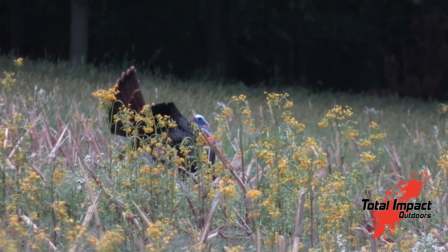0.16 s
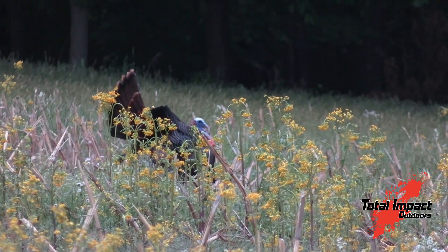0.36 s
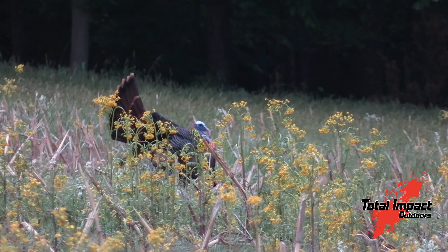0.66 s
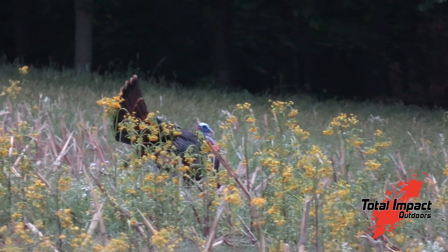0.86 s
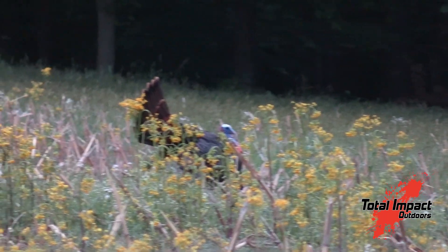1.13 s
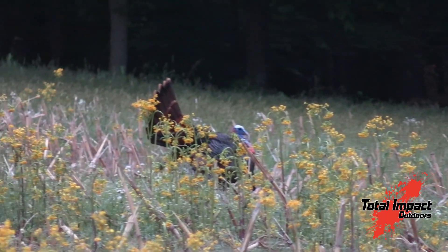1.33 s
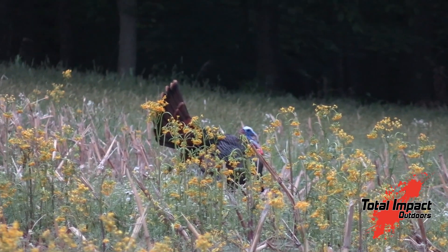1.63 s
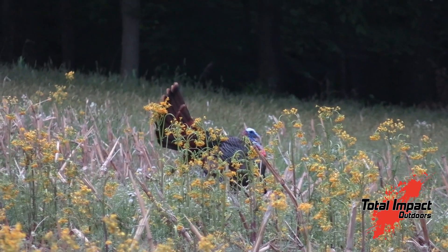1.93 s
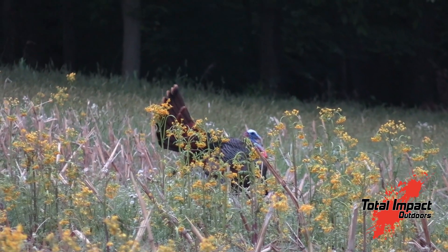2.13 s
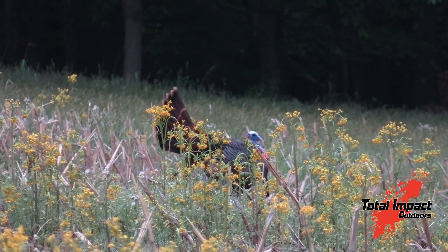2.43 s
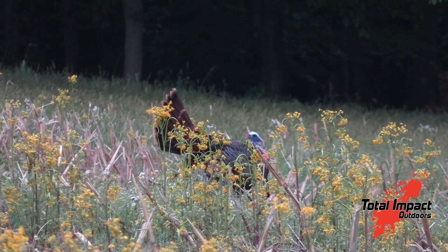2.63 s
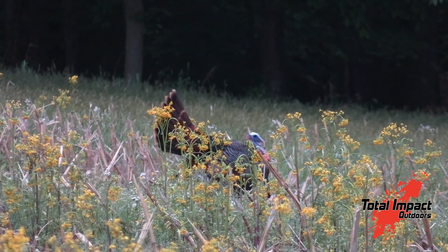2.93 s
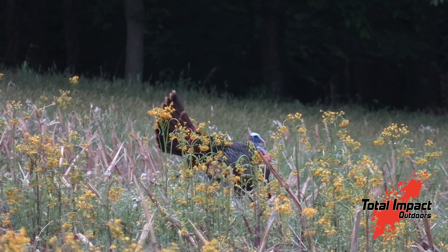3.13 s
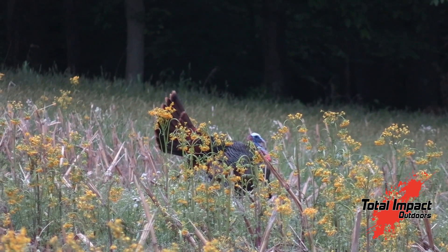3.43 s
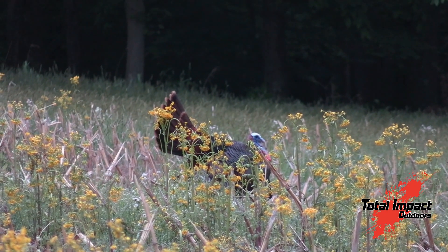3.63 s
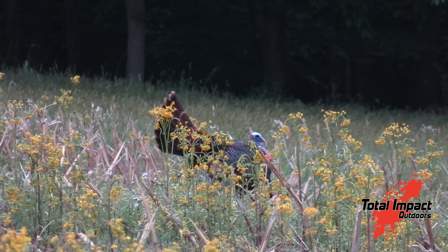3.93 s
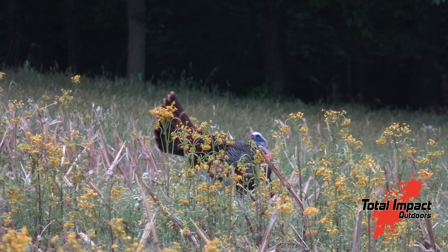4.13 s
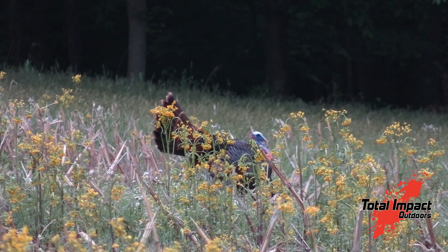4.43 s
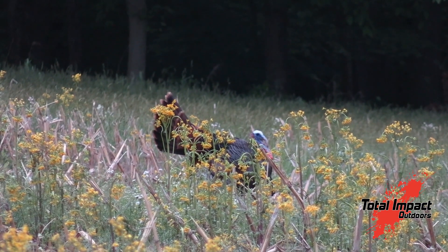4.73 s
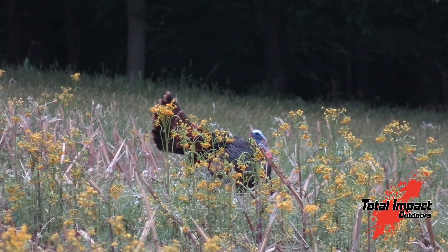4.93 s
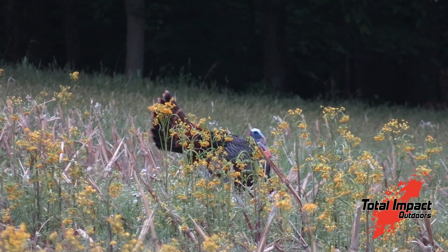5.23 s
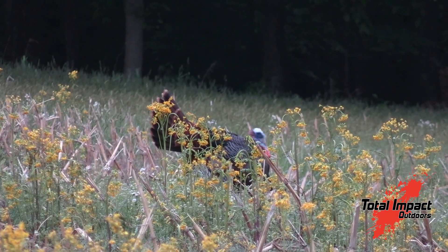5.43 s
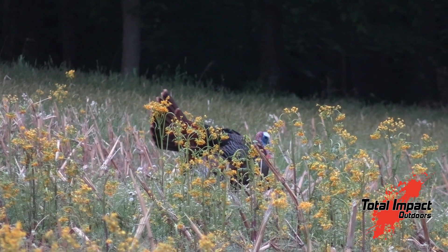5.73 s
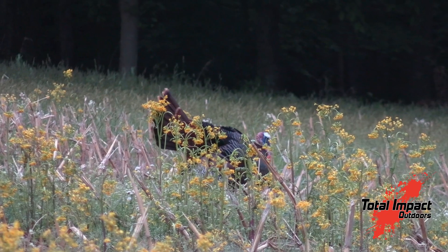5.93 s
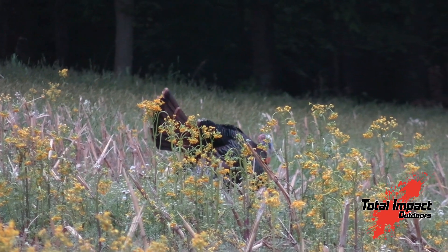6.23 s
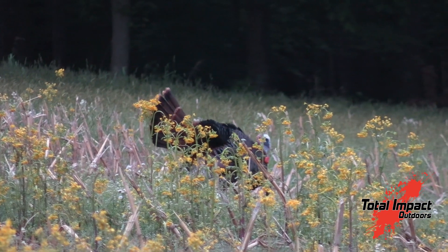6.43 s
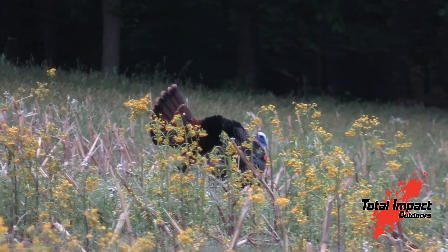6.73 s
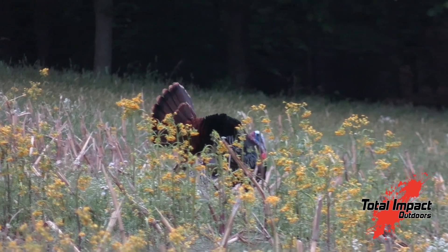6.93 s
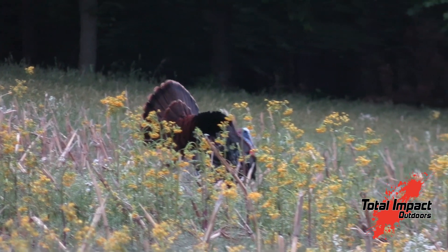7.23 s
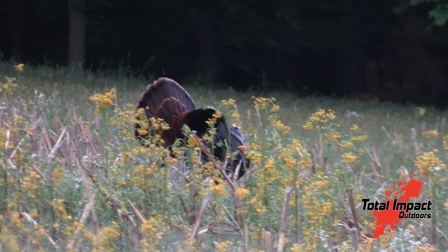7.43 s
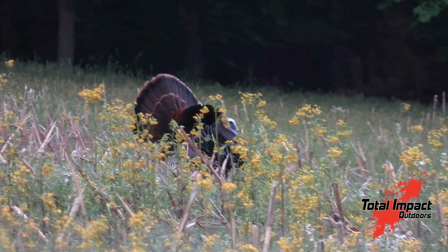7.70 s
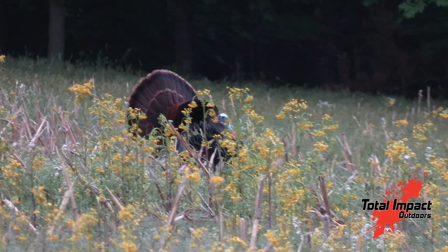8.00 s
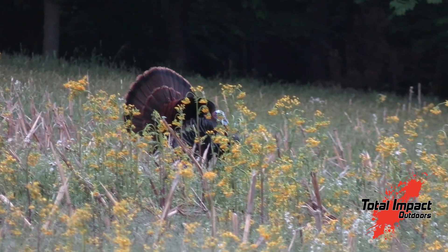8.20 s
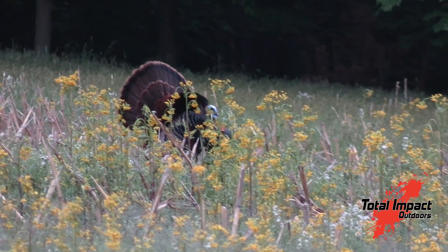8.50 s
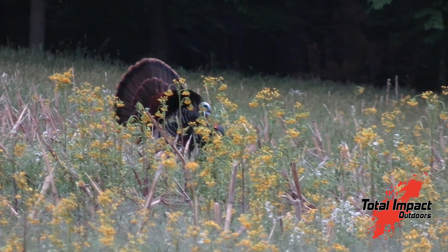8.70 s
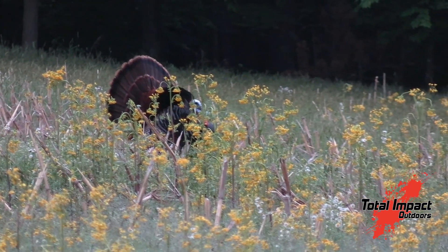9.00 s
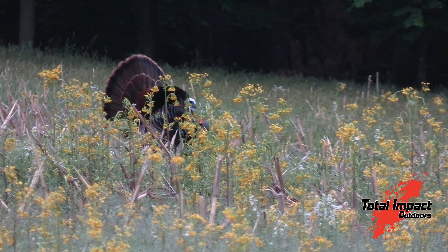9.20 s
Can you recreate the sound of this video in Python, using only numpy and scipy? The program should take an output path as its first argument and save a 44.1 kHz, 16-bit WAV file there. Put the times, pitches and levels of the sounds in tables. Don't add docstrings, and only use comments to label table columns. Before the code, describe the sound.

A near cricket repeats short bright chirps of a few pulses, answered by a second farther one and a faint third. Behind them many songbirds whistle, slur and twitter, smeared by woodland echo into a hissing chorus. Dull knocks bump the camera around one and a half seconds; a tick comes near four, then a soft thud with leaf rustle near eight. Low hum and light wind, one small outdoor camera microphone.

```python
import sys
import numpy as np
from scipy import signal
from scipy.fft import rfft, irfft
from scipy.io import wavfile
from scipy.ndimage import uniform_filter1d

SR = 44100
rng = np.random.default_rng(int(sys.argv[2]) if len(sys.argv) > 2 else 0)


def file_out(sig):
    cols = np.atleast_2d(sig).T
    lim = np.clip(cols, -1, 1)
    pcm = np.round(lim * 32767).astype(np.int16)
    wavfile.write(sys.argv[1], SR, pcm)


def natural_amplitude(level_db):
    exponent = np.asarray(level_db, float) / 20
    return 10 ** exponent


N = 412776

# pitch_hz, level_db (per Hz)
AIR = [(25, -17), (55, -17), (100, -5), (200, -12.5), (450, -15.5), (800, -12), (1300, -14), (2000, -19),
       (4500, -16.5), (5700, -31.5), (7000, -33.5), (10000, -35.5), (15000, -40)]
AIR_DB = -53.5
# start_s, level_db
RUMBLE = [(0, -84), (.5, -80), (.65, -66), (1.45, -59.5), (1.8, -68), (2.1, -58), (2.3, -77),
          (4.001, -75.5), (9.36, -64)]
# start_s, length_s, level_db
GUSTS = [
    (.35, .5, -65.5),
    (7.4, 1.3, -60),
    (8.2, 1.6, -68),
]
STEADY_BREEZE_DB = -75.5
# pitch_hz, width_hz, level_db
HUMS = [
    (132.7, 9.65, -60.5),
    (592, 8, -73),
]
# start_s, length_s, pitch_hz, width_hz, level_db
DRONE = (7, 3.5, 1336, 300, -63.5)

# start_s, level_db, lean_db_per_octave (to the higher voices)
FLOCK = [(0.0, -46, -0.5), (0.94, -47, 10), (1.54, -46, 1), (2.4, -47, 9), (2.63, -50, -2),
         (3.0, -56.5, -2), (3.23, -51.5, -4), (3.52, -45.5, -5), (3.91, -52.5, 2), (4.82, -47.5, -8),
         (5.13, -53, -10), (6.31, -46.5, 5), (7.04, -51.5, -3), (7.3, -48.5, 8), (7.45, -46.5, -1),
         (8.0, -51, 5.5), (8.86, -46.5, 1), (9.36, -47.5, 2)]
# pitch_hz, level_db
CHORUS_EDGES = [(1800, -23.5), (2250, -8.5), (2600, -3.5), (3550, 5), (4700, 0), (5100, -21.5), (6500, -29),
                (9500, -77)]
# pitch_hz, level_db
TREBLE = [(4300, -30), (5100, 10.5), (5900, -0.5), (6500, -6.5), (7800, -17), (9500, -57)]
# start_s, length_s, level_db
TREBLE_SPELLS = [
    (-.3, 1.2, -83),
    (.95, 0.87, -79.5),
    (1.4, 1.4, -79),
    (7.8, 2.7, -84),
]
BUZZES_S = [.15, 3.25, 6.67]
# length_s, pitch_hz, width_hz, level_db
BUZZ = (.17, 6400, 1000, -81.5)

# start_s, length_s, pitch_hz, level_db
HELD = [(.05, 0.062, 4024, -54.5), (0.34, 0.14, 3914, -58), (0.689, 0.045, 3950, -51),
        (0.923, 0.066, 3370, -50), (0.972, 0.06, 3250, -52), (1.08, 0.042, 5430, -59),
        (1.05, .03, 4700, -57), (1.135, 0.065, 2490, -57.5), (7.355, .05, 3050, -56),
        (2.34, .02, 2230, -56.5), (3.39, .025, 3600, -49), (8.41, 0.054, 2300, -66), (5.44, .03, 2290, -61),
        (5.645, .016, 2330, -60), (5.365, .02, 2380, -59), (3.521, 0.14, 3590, -53),
        (4.416, 0.17, 3035, -61), (6.375, 0.072, 3300, -58), (5.108, .04, 3050, -60),
        (4.62, 0.1, 2950, -60), (4.8, 0.049, 2194, -58), (5.422, 0.069, 3890, -50),
        (5.663, 0.16, 4030, -52.5), (6.7, 0.067, 4330, -50), (6.6, 0.06, 4330, -56),
        (6.35, 0.14, 3665, -53), (6.47, 0.12, 3660, -56), (7.07, 0.058, 5810, -71), (8.3, .09, 4620, -57),
        (8.0, 0.089, 4160, -55), (8.349, 0.055, 2530, -59.5), (8.551, 0.094, 2270, -61),
        (8.953, 0.04, 3170, -43), (9.0, 0.052, 3170, -57)]
# start_s, length_s, start_hz, end_hz, level_db
RISES = [(.72, 0.038, 4640, 5160, -54), (1.158, 0.025, 2640, 3230, -52), (2.132, 0.015, 3070, 3380, -46),
         (2.36, 0.023, 2950, 3330, -41.5), (2.345, .016, 2300, 2950, -53), (3.3, 0.048, 2560, 2700, -56),
         (3.425, 0.033, 3130, 3650, -46), (3.6, 0.024, 3050, 3400, -42), (4.11, 0.032, 2490, 2770, -56),
         (4.72, .04, 3180, 3670, -53), (4.838, 0.026, 2220, 3160, -48), (5.46, 0.024, 2260, 3120, -59),
         (5.635, 0.035, 3500, 4060, -49), (5.65, .05, 3450, 3600, -55), (5.85, 0.05, 2320, 2740, -53.5),
         (5.94, 0.071, 2150, 2910, -58), (5.975, 0.056, 3500, 4350, -50), (6.16, .04, 3000, 4080, -46),
         (6.268, 0.023, 3090, 3325, -42.5), (6.235, .04, 2350, 3000, -52), (6.6, .04, 3270, 3500, -56),
         (5.93, .035, 2900, 3570, -55), (6.51, .035, 2250, 2560, -55.5), (6.55, 0.042, 2810, 3260, -52.5),
         (.908, .018, 2590, 2950, -59), (7.31, 0.0305, 3000, 3450, -51), (7.335, .04, 3450, 3800, -59),
         (8.752, 0.024, 2950, 3400, -44.5), (8.775, .06, 3400, 3500, -55), (8.82, .04, 2410, 2760, -58)]
# start_s, length_s, start_hz, end_hz, level_db
FALLS = [(1.176, 0.08, 3266, 3180, -42.5), (4.758, 0.018, 3420, 3050, -44), (.77, 0.045, 3700, 3230, -56),
         (.883, .028, 3050, 2600, -53), (1.27, 0.16, 2515, 2255, -61.5), (2.235, 0.037, 3350, 2905, -43.5),
         (2.328, .018, 2800, 2250, -56), (2.41, 0.04, 2770, 2560, -53), (2.5, 0.074, 3010, 2210, -58),
         (3.44, 0.063, 3370, 2485, -49.5), (3.619, 0.051, 3300, 2520, -52), (4.06, 0.048, 3200, 2370, -63),
         (4.77, 0.033, 3120, 2260, -52), (5.435, 0.03, 3400, 2215, -56), (5.78, 0.08, 3250, 2270, -58),
         (5.86, 0.068, 2700, 2150, -63), (6.2, 0.049, 3450, 2190, -54), (5.175, .02, 3900, 3550, -54),
         (5.46, .03, 3700, 3000, -52), (7.49, 0.038, 2480, 2420, -55), (6.31, 0.0596, 4080, 3650, -49),
         (7.159, .07, 5570, 4040, -55), (7.272, 0.017, 3400, 2950, -50), (7.288, .035, 2750, 2480, -56),
         (3.585, .015, 3350, 2760, -46), (7.44, 0.031, 3340, 2505, -47), (7.49, 0.042, 2450, 2110, -55),
         (8.2, 0.056, 3300, 2550, -57.5), (8.27, 0.042, 2890, 2210, -59), (8.5, 0.057, 2700, 2200, -59),
         (8.782, .022, 2900, 2500, -48), (8.808, 0.019, 2690, 2170, -54), (8.918, 0.021, 3340, 2820, -45.5)]
RISE_DONE, FALL_DONE = .6, .66
# delay_s, length_s, start_hz, end_hz, level_db
COUPLET = [
    (0, 0.031, 2183, 2500, -56),
    (.035, .03, 2550, 2800, -58),
    (.1, 0.071, 3020, 3040, -56),
]
SWOOP = [
    (0, .025, 5750, 4950, -60),
    (.02, 0.036, 4970, 4950, -57),
    (.06, 0.037, 4940, 6060, -62.5),
    (.095, 0.1, 6080, 6140, -71.5),
]
FLICK = [(0.008, 0.014, 4750, 5720, -60)]
HOOK = [
    (.005, .035, 4690, 5920, -61),
    (.035, .09, 5850, 5900, -72),
]
COUPLETS_S = [6.254, 6.585, 6.919, 7.249, 7.59]
# syllable, delay_s
HIGH_SONG = [(SWOOP, 0), (SWOOP, .272), (FLICK, .568), (FLICK, .678), (HOOK, 1.088), (HOOK, 1.31)]
HIGH_SONGS_S = [-.062, 7.853]
# start_s, length_s, start_hz, middle_hz, end_hz, level_db
CHIPS = [
    (1.409, .016, 10900, 7100, 10800, -49),
    (5.495, 0.015, 10600, 7170, 10300, -47),
]
# start_s, length_s,
# start_hz, end_hz, level_db
DEEP_SLURS = [(.55, .09, 3790, 3940, -45), (.66, .08, 3850, 4060, -48), (4.49, 0.056, 3300, 3500, -56),
              (4.5, .12, 5100, 5250, -64), (4.63, .05, 5000, 5400, -61), (0.049, 0.14, 3850, 4070, -58),
              (.3, .12, 3850, 3940, -54), (0.623, 0.035, 4000, 5600, -59), (0.929, 0.16, 3400, 3474, -51),
              (1.02, .035, 4300, 5800, -59), (1.199, 0.096, 3600, 6000, -54),
              (1.98, 0.047, 2750, 3000, -60), (1.996, 0.21, 3650, 3740, -48),
              (2.358, 0.064, 3300, 3900, -41.5), (3.33, 0.083, 3400, 3740, -54),
              (4.45, 0.082, 3000, 3610, -56), (4.847, 0.097, 3000, 3070, -53),
              (4.94, 0.073, 2900, 3600, -55), (5.406, 0.043, 3300, 3900, -51),
              (5.459, 0.048, 2300, 3520, -60), (5.641, 0.046, 3500, 4060, -49),
              (5.935, .05, 3000, 3604, -45.5), (5.999, 0.096, 3450, 3660, -49.5),
              (6.211, 0.043, 4300, 5000, -49), (6.25, 0.076, 2500, 3520, -58),
              (6.569, .07, 3000, 3580, -52), (6.802, .04, 2900, 3730, -47), (7.44, 0.045, 3600, 4600, -52),
              (7.679, 0.084, 2350, 3130, -53.5), (8.25, 0.068, 3700, 4200, -50.5),
              (8.54, 0.034, 4500, 5380, -53),
              (.75, 0.074, 3800, 3200, -48), (1.5, 0.078, 3785, 3600, -46.5),
              (1.62, 0.073, 3210, 2450, -58), (1.78, 0.11, 3750, 3500, -48.5), (2.2, .05, 4200, 3300, -45),
              (2.45, 0.095, 3900, 3290, -49), (2.8, 0.058, 3200, 2690, -57), (4.4, .08, 3410, 2190, -57),
              (4.63, 0.08, 3000, 2520, -61), (5.155, .04, 4000, 3890, -50), (5.17, 0.1, 3910, 3040, -55),
              (5.43, 0.031, 3800, 2240, -55), (5.72, .1, 3900, 3020, -52), (6.13, 0.0286, 3100, 2580, -46),
              (6.15, .025, 2550, 2200, -55), (6.65, .08, 3750, 3170, -51), (7.5, 0.13, 4270, 3030, -57),
              (8.5, .14, 4440, 4270, -53), (8.58, 0.084, 3620, 2720, -50.5), (8.68, .06, 3100, 2530, -55),
              (8.88, 0.048, 3900, 2980, -48), (9.07, 0.051, 3800, 3530, -49), (9.17, 0.07, 2995, 2600, -54)]

# time_ms, pitch_hz, level_db
NEAR_WING = [(2.01, 4560, -50), (4.5, 4530, -40), (12.7, 4455, -32), (19.6, 4290, -32), (21.1, 4150, -40),
             (23.3, 4200, -35), (25, 4130, -47), (26.8, 4180, -35), (29.3, 4050, -55)]
MID_WING = [(0, 5200, -58), (3, 4950, -50.5), (9.5, 4850, -47), (14, 4720, -34), (15.3, 4660, -36),
            (16.7, 4720, -57), (19.2, 4740, -37.5), (21.5, 4770, -42), (24, 4600, -64)]
FAR_WING = [(1, 5150, -64), (5, 5080, -58), (12, 4990, -51.5), (15, 4940, -52), (18, 4800, -66)]
# lead_s (before the first full one), length_s, start_hz, end_hz, level_db
NEAR_OPEN = (.042, .019, 4520, 4080, -37.5)
MID_OPEN = (.039, .02, 4730, 4620, -43)
# delay_s, length_s, start_hz, middle_hz, end_hz, level_db
NEAR_OVERTONES = [(.001, .022, 13650, 13250, 12400, -76)]
MID_OVERTONES = [(-.003, 0.027, 9650, 9570, 8950, -71), (-.003, 0.024, 14550, 14530, 13850, -74)]
# first_s, last_s, haste_ms (inner stroke early by)
NEAR_CHIRPS = [(.2154, .277, 0), (1.2671, 1.3913, 5.3), (1.6681, 1.7842, 3.7), (2.0761, 2.1937, 2.7),
               (2.4962, 2.6159, 3.9), (2.8551, 2.9782, 4.9), (3.3036, 3.426, 4.8), (3.6979, 3.8197, 2.1),
               (4.1775, 4.2991, 4.4), (4.5861, 4.7053, 5.1), (4.9507, 5.0724, 3.4), (5.375, 5.4978, 4.5),
               (5.7623, 5.884, 3.9), (6.1327, 6.191, 0), (6.4458, 6.568, 5.7), (6.8712, 6.9962, 3.3),
               (7.2562, 7.3763, 1.7), (8.7761, 8.8984, 2.3), (9.192, 9.3149, 5.2)]
# first_s, last_s
MID_CHIRPS = [(.5352, .6498), (1.1243, 1.2385), (1.5778, 1.6942), (2.1826, 2.2955), (2.7334, 2.8478),
              (3.2343, 3.3511), (3.7708, 3.8267), (4.2487, 4.3623), (4.7191, 4.8432), (5.152, 5.279),
              (5.6072, 5.6648), (5.9711, 6.0868), (6.5034, 6.6207), (7.126, 7.241), (7.5979, 7.7128),
              (8.194, 8.2504), (8.7091, 8.8273), (9.2888, 9.343)]
FAR_CHIRPS = [(.3879, .3879), (.9043, .9043), (1.3369, 1.3931), (1.8578, 1.9128), (2.4287, 2.537),
              (2.9027, 2.9577), (3.5295, 3.6406), (3.9744, 4.0826), (4.6778, 4.6778), (5.093, 5.093),
              (5.7158, 5.7707), (6.1224, 6.176), (6.6539, 6.7619), (7.7599, 7.8163), (8.9185, 8.9707)]
STROKE_GAP_S = .058
# start_s, length_s, start_hz, end_hz, level_db
STUMBLES = [
    (3.886, 0.011, 4730, 5180, -42),
    (3.896, .018, 5100, 4630, -42),
    (4.833, .01, 4900, 5130, -47),
    (5.203, 0.013, 4900, 5150, -44),
    (5.218, .007, 5240, 5030, -45),
    (5.266, .01, 4900, 5200, -47),
    (8.319, 0.014, 5120, 4770, -37),
]
SLIPS_S = [3.899, 4.854, 5.226, 5.29, 8.321]

# start_s, level_db
BUMPS = [
    (.93, -47),
    (1.343, -41),
    (1.402, -39.5),
    (1.481, -43),
    (1.577, -47.5),
]
# pitch_hz, t60_s, level_db
BODY = [
    (147, 0.19, -1.5),
    (253, 0.063, 1.5),
    (323, 0.06, 1.5),
]
# start_s, pitch_hz, t60_s, level_db
THUD = (7.995, 67, 0.3, -44.5)
# start_s, length_s, level_db
TICK = (4.2062, 0.00013, -29)
# start_s, length_s, level_db
RUSTLE = (7.971, 0.035, -43)
# pitch_hz, level_db
RUSTLE_TONE = [(1200, -18), (1900, 1), (4500, 3), (6000, -18), (8000, -29), (12000, -24), (15500, -30)]


def evened(x):
    return x / np.sqrt(np.mean(x ** 2) + 1e-20)


def read(points, hz):
    f, value = np.transpose(points)
    return np.interp(np.log(hz + 1), np.log(f + 1), value)


def add(mix, s, sound):
    at = round(s * SR)
    part = mix[max(at, 0):][:max(len(sound) + min(at, 0), 0)]
    part += sound[max(-at, 0):][:len(part)]


def coloured(x, points):
    gain = natural_amplitude(read(points, np.fft.rfftfreq(len(x), 1 / SR)))
    return irfft(rfft(x) * gain, len(x))


def slow_noise(noise, width_hz):
    hz = np.fft.rfftfreq(N, 1 / SR)
    return evened(irfft(rfft(noise) / (1 + (hz / width_hz) ** 4), N))


def spells(rows, t):
    power = 0
    for s, length, db in rows:
        swell = np.sin(np.pi * np.clip((t - s) / length, 0, 1))
        power = power + (natural_amplitude(db) * swell) ** 2
    return np.sqrt(power)


def whistle(length, *hz, db, soft=.8):
    u = np.linspace(0, 1, max(round(length * SR), 8))
    bow = 4 * (hz[1] - (hz[0] + hz[-1]) / 2) if len(hz) == 3 else 0
    path = hz[0] + (hz[-1] - hz[0]) * u + bow * u * (1 - u)
    ends = np.minimum(np.minimum(u, 1 - u) * 2 / np.clip(soft, .01, 1), 1)
    return natural_amplitude(db) * np.sin(np.pi / 2 * ends) ** 2 * np.sin(2 * np.pi * np.cumsum(path) / SR)


def echoes(x, t60, build):
    at = np.arange(0, SR, 20) + rng.integers(0, 20, SR // 20)
    signs = rng.choice([-1., 1.], len(at))
    taps = np.zeros(SR + 20)
    taps[at] = signs * natural_amplitude(-60 * at / SR / t60) * (1 - np.exp(-at / SR / build))
    return irfft(rfft(x) * rfft(taps / np.linalg.norm(taps), N), N)


def fluttered(x, width_hz, depth):
    shake = slow_noise(rng.standard_normal(N), width_hz)
    return x * (1 + depth * shake) / np.sqrt(1 + depth ** 2)


def air():
    floor, wind, gust, *hum_noises = rng.standard_normal((3 + len(HUMS), N))
    t = np.arange(N) / SR
    out = natural_amplitude(AIR_DB) * evened(coloured(floor, AIR))

    start, length, hz, width, db = DRONE
    motor_band = [(hz - 2 * width, -40), (hz, 0), (hz + 2 * width, -40)]
    out += spells([(start, length, db)], t) * evened(coloured(floor[::-1], motor_band))

    gust_tone = [(50, -18), (90, -4), (300, -2.5), (450, -22), (900, -60)]
    out += (natural_amplitude(STEADY_BREEZE_DB) + spells(GUSTS, t)) * evened(coloured(gust, gust_tone))

    s, db = np.transpose(RUMBLE)
    rumble_tone = [(12, -28), (25, 4), (60, 5), (110, -28), (300, -70)]
    out += natural_amplitude(np.interp(t, s, db) + 0.5) * evened(coloured(wind, rumble_tone))

    for noise, (hz, width, db) in zip(hum_noises, HUMS):
        waver = slow_noise(noise, width)
        path = hz + 0.457 * width * waver[::-1]
        out += natural_amplitude(db) * np.sqrt(2) * (0.84 + 0.26 * waver) * np.sin(2 * np.pi * np.cumsum(path) / SR)
    return out


def chorus():
    draws, notes = rng.random((2600, 6)), np.zeros(N)
    for s, length, hz, bend, end, db in draws:
        hz = 1700 + 6500 * hz
        mid_hz, end_hz = hz + 1100 * (bend - .5), hz + 2200 * (end - .5)
        add(notes, s * N / SR, whistle(.02 + .06 * length, hz, mid_hz, end_hz, db=10 * db))
    blur = .75 * evened(echoes(notes, .07, .004))
    blur += evened(echoes(fluttered(notes, 250, 2.5), 1.4, 0.0084))
    blur += .8 * rng.standard_normal(N) * np.sqrt(SR / 2 / 6500)

    hz, t, z = signal.stft(blur, SR, nperseg=512)
    z = z / np.sqrt(uniform_filter1d((abs(z) ** 2).mean(1), size=3) + 1e-12)[:, None]
    s, loud_db, lean = np.transpose(FLOCK)
    octaves = np.log2(np.clip(hz, 2400, 4800) / 3500)[:, None]
    swell_db = np.interp(t, s, loud_db) + octaves * np.interp(t, s, lean)
    main = natural_amplitude(swell_db + read(CHORUS_EDGES, hz)[:, None] - 17.5)
    high = natural_amplitude(read(TREBLE, hz))[:, None] * spells(TREBLE_SPELLS, t)
    length, buzz_hz, width, db = BUZZ
    buzz_band = np.exp(-((hz[:, None] - buzz_hz) / width) ** 4)
    high += buzz_band * spells([(s, length, db) for s in BUZZES_S], t)
    return signal.istft(z * np.hypot(main, high), SR, nperseg=512)[1][:N]


def slur_middle(start_hz, end_hz):
    done = RISE_DONE if end_hz > start_hz else FALL_DONE
    return start_hz + (end_hz - start_hz) * done


def notes_sung():
    notes = RISES + FALLS + [(s, length, hz, hz, db) for s, length, hz, db in HELD]
    calls = [(COUPLET, s) for s in COUPLETS_S]
    calls += [(syllable, s + delay) for s in HIGH_SONGS_S for syllable, delay in HIGH_SONG]
    for parts, s in calls:
        notes += [(s + delay, *rest) for delay, *rest in parts]
    return notes


def songbirds():
    out, near = np.zeros(N), np.zeros(N)
    for s, length, start_hz, end_hz, db in notes_sung():
        add(out, s, whistle(length, start_hz, slur_middle(start_hz, end_hz), end_hz, db=db, soft=0.33))
    for s, length, *hz, db in CHIPS:
        call = whistle(length, *hz, db=db, soft=0.18)
        call[round(.7 * len(call)):] *= natural_amplitude(-7)
        u = np.linspace(0, 1, len(call))
        add(near, s, call * natural_amplitude(-13 * (u - .42) ** 2 / 0.61))
    direct = natural_amplitude(6) * fluttered(out, 150, .33)
    trunks = echoes(fluttered(out, 120, 1.1), .14, .003)
    wood = natural_amplitude(-0.4) * echoes(fluttered(out, 140, 1.2), 0.51, 0.033)
    return direct + trunks + wood + near + natural_amplitude(-13) * echoes(near, 0.13, .003)


def deep_singers():
    out = np.zeros(N)
    for s, length, start_hz, end_hz, db in DEEP_SLURS:
        add(out, s, whistle(length, start_hz, slur_middle(start_hz, end_hz), end_hz, db=db, soft=0.24))
    trace = natural_amplitude(1) * fluttered(out, 300, .9)
    smear = natural_amplitude(0.5) * echoes(fluttered(out, 220, 1.6), 0.43, 0.0047)
    tail = natural_amplitude(-7.0) * echoes(fluttered(out, 200, 1.6), 0.68, .03)
    return trace + smear + tail


def strokes_of(chirps, haste_ms=0):
    out = []
    for first, last, *own_ms in chirps:
        count = 1 + round((last - first) / STROKE_GAP_S)
        times = np.linspace(first, last, count)
        times[1:-1] -= (own_ms or [haste_ms])[0] / 1000
        out.append(times)
    return out


def opening_stroke(out, first_s, opening, overtones):
    lead, length, start_hz, end_hz, db = opening
    add(out, first_s - lead, whistle(length, start_hz, end_hz, db=db, soft=0.84))
    for _, _, _, mid_hz, _, over_db in overtones:
        faded_db = over_db + 24.7 - mid_hz / 480
        add(out, first_s - lead, whistle(length, 0.985 * mid_hz, .96 * mid_hz, db=faded_db))


def cricket(chirps, wing, opening=None, overtones=()):
    ms, hz, db = np.transpose(wing)
    t = np.arange(0, ms[-1], 1000 / SR)
    turns = np.cumsum(np.interp(t, ms, hz)) / SR
    out = np.zeros(N)
    for strokes in chirps:
        if opening:
            opening_stroke(out, strokes[0], opening, overtones)
        for s in strokes:
            size = natural_amplitude(np.interp(t, ms, db, left=-99) + 0.41 * rng.standard_normal())
            add(out, s, size * np.sin(2 * np.pi * (turns + rng.random())))
            for delay, length, *over_hz, over_db in overtones:
                add(out, s + delay, whistle(length, *over_hz, db=over_db, soft=0.32))
    return out


def crickets():
    out = cricket(strokes_of(NEAR_CHIRPS), NEAR_WING, NEAR_OPEN, NEAR_OVERTONES)
    out += cricket(strokes_of(MID_CHIRPS, haste_ms=3.2), MID_WING, MID_OPEN, MID_OVERTONES)
    out += cricket(strokes_of(FAR_CHIRPS, haste_ms=.6), FAR_WING)
    for s, length, start_hz, end_hz, db in STUMBLES:
        add(out, s, whistle(length, start_hz, end_hz, db=db, soft=0.46))
        add(out, s, whistle(length, 9700, 9450, db=-70))
    for s in SLIPS_S:
        add(out, s, whistle(.0025, 5000, 6100, db=-50))
    return out + natural_amplitude(-12.0) * echoes(out, 0.17, 0.0022)


def handling():
    out, t = np.zeros(N), np.arange(SR // 4) / SR
    knocks = [(s, hz, t60, db + mode_db) for s, db in BUMPS for hz, t60, mode_db in BODY]
    for s, hz, t60, db in knocks + [THUD]:
        size = natural_amplitude(db - 60 * t / t60) * (1 - np.exp(-t / 0.0052))
        add(out, s, size * np.sin(2 * np.pi * hz * t))

    s, length, db = TICK
    u = (t[:200] - .0005) / length
    add(out, s - .0005, natural_amplitude(db) * 1.75 * -(u - .7) * np.exp(-(u - .4) ** 2))

    s, length, db = RUSTLE
    count = round(length * SR)
    grain = rng.standard_normal(count)
    uneven_db = 3.5 * uniform_filter1d(rng.standard_normal(count), size=40) * np.sqrt(40)
    leaves = evened(coloured(grain * natural_amplitude(uneven_db), RUSTLE_TONE))
    add(out, s, natural_amplitude(db) * leaves * signal.windows.tukey(count, .15))
    return out


def scene():
    return (crickets() + songbirds() + chorus() + air() + handling() + deep_singers())[None]


def band_limit(x):
    return signal.sosfilt(signal.butter(12, 15750, fs=SR, output="sos"), x)


def record(dry):
    low_pass = signal.firwin(255, 15930, fs=SR)
    mix = signal.oaconvolve(dry, low_pass[None], "same")
    return band_limit(mix)


dry = scene()
out = record(dry)
file_out(out)
```